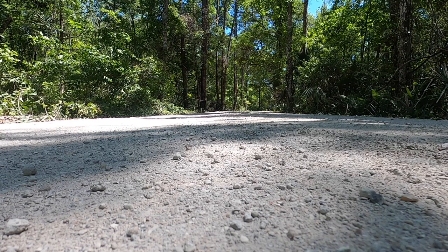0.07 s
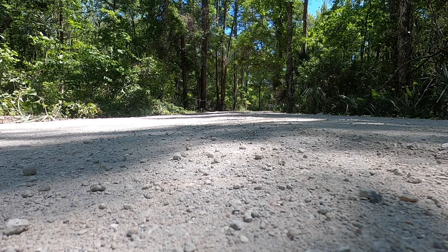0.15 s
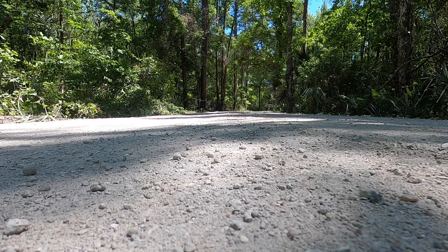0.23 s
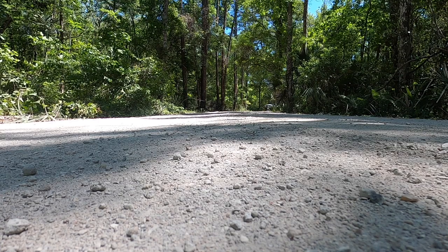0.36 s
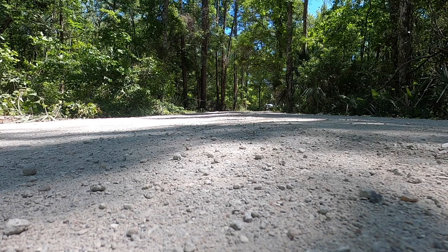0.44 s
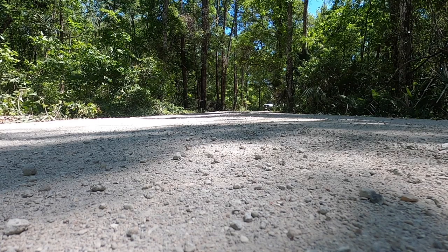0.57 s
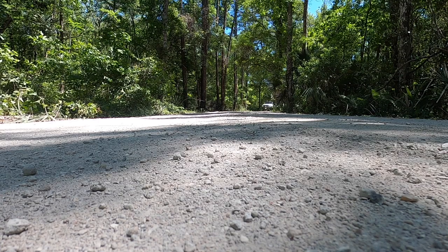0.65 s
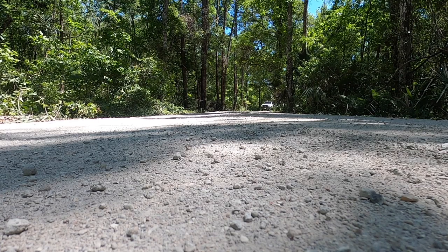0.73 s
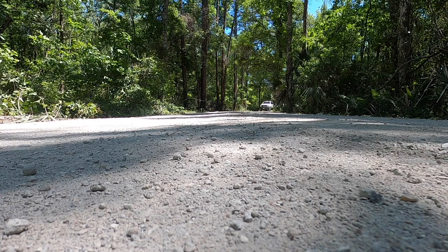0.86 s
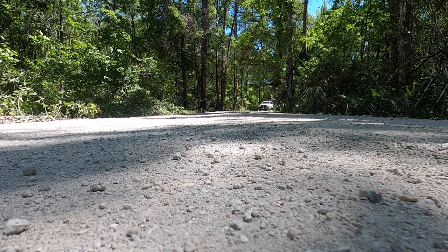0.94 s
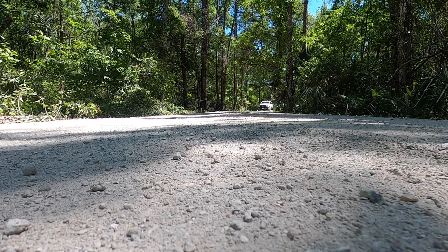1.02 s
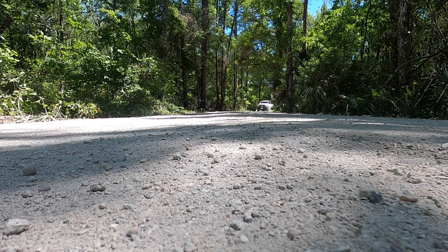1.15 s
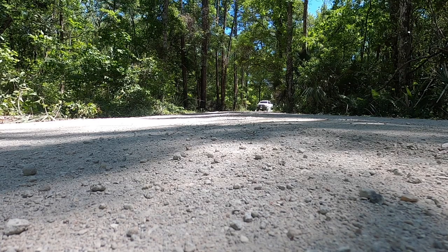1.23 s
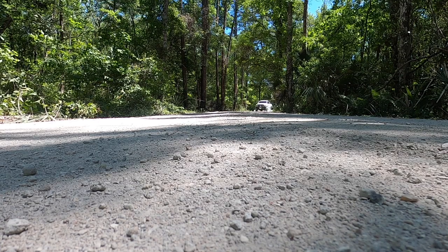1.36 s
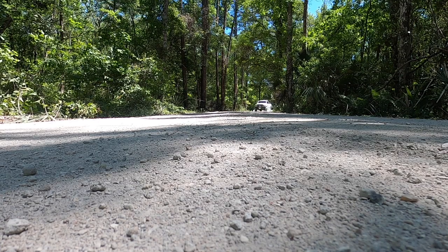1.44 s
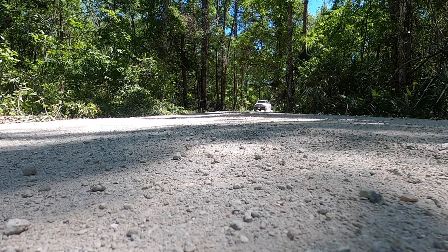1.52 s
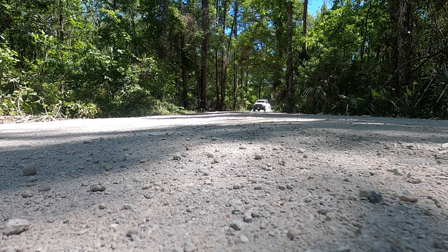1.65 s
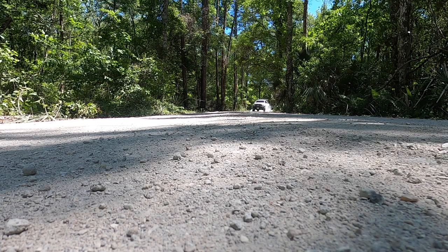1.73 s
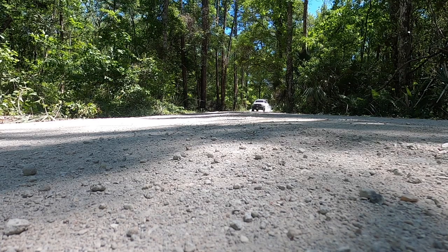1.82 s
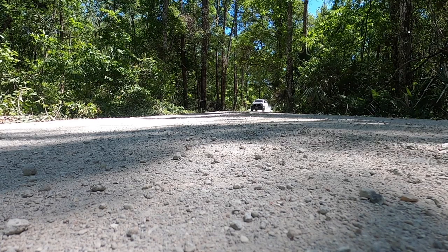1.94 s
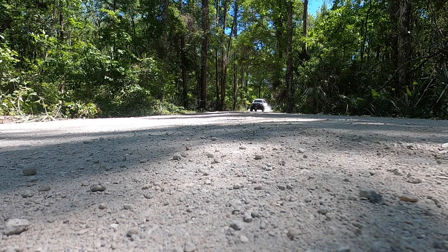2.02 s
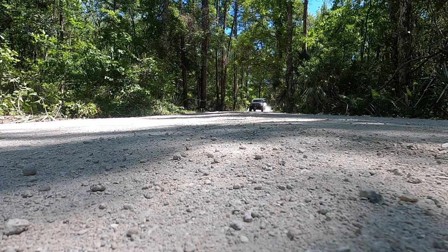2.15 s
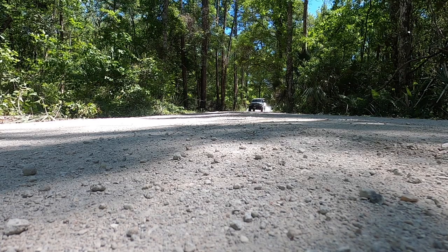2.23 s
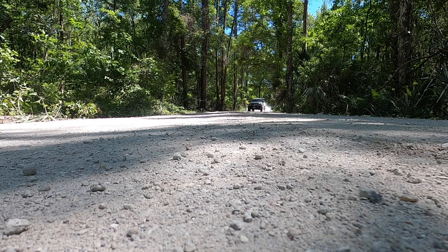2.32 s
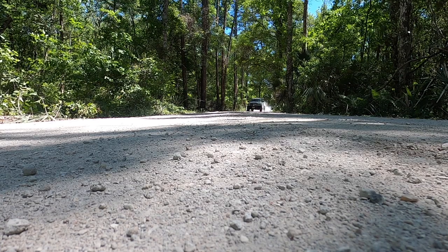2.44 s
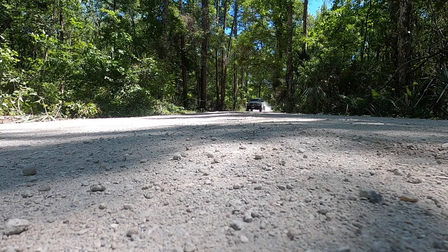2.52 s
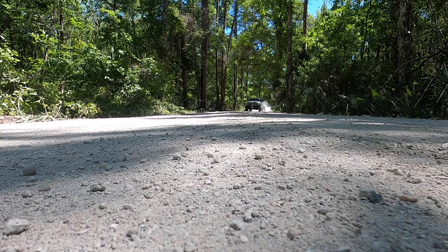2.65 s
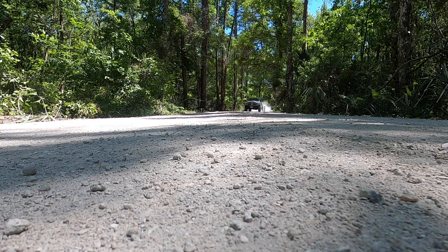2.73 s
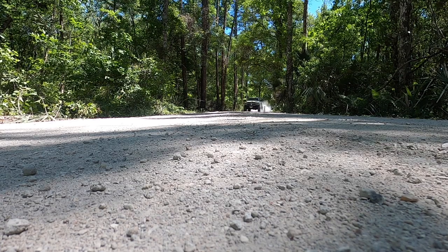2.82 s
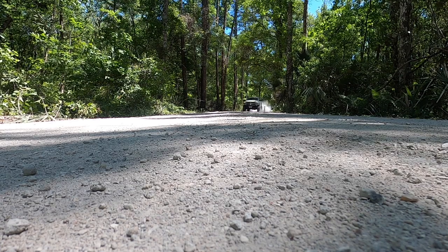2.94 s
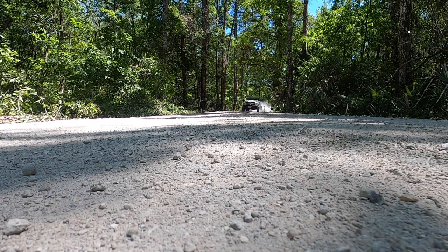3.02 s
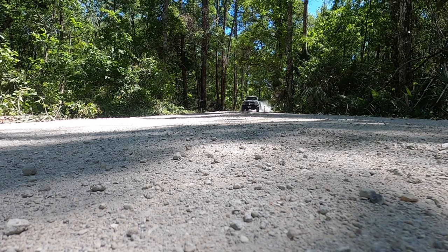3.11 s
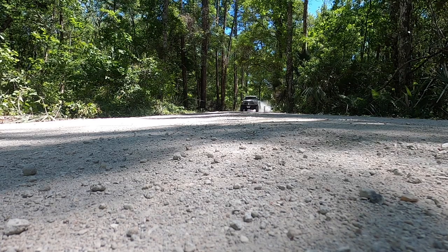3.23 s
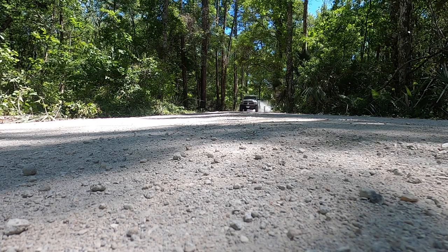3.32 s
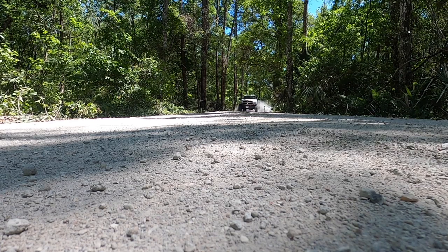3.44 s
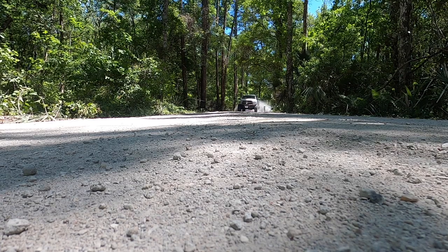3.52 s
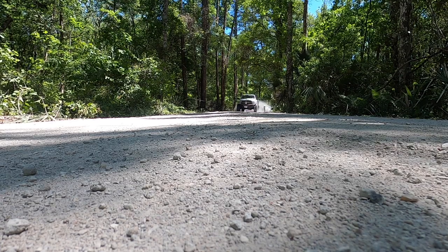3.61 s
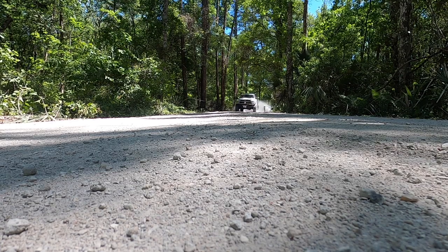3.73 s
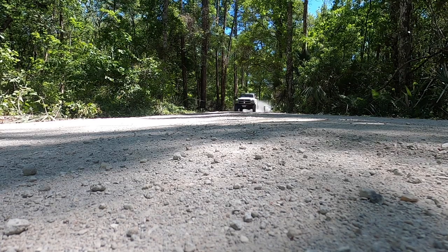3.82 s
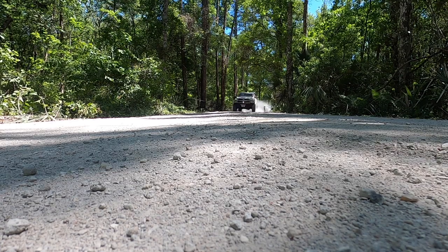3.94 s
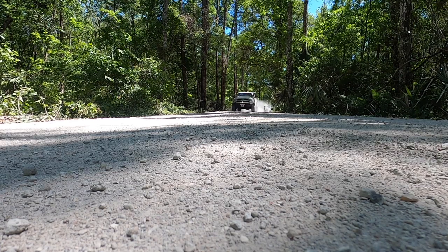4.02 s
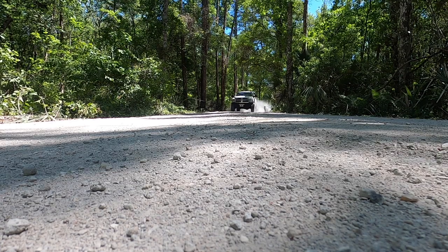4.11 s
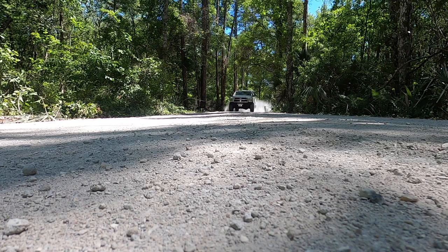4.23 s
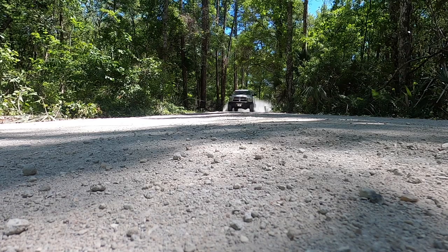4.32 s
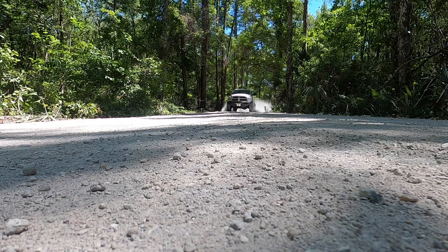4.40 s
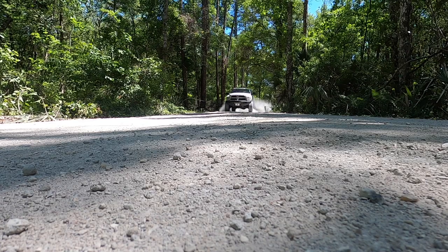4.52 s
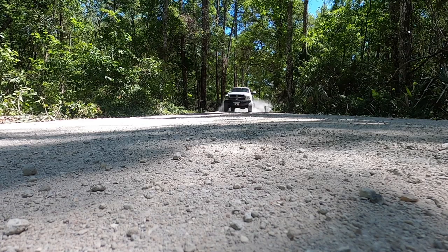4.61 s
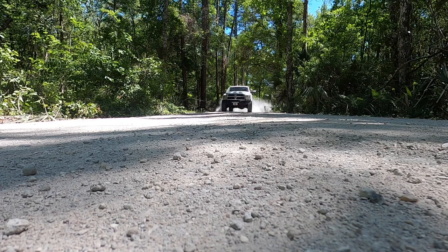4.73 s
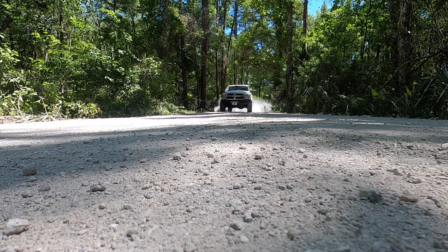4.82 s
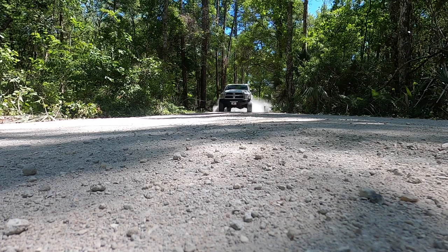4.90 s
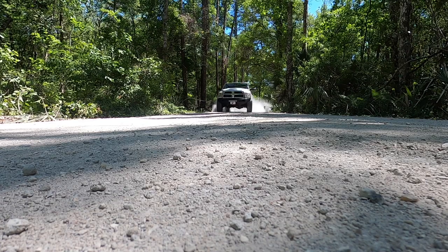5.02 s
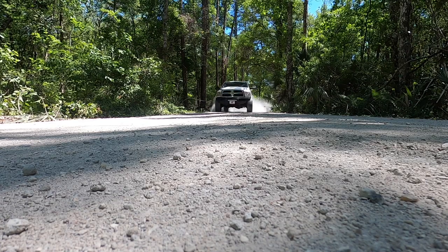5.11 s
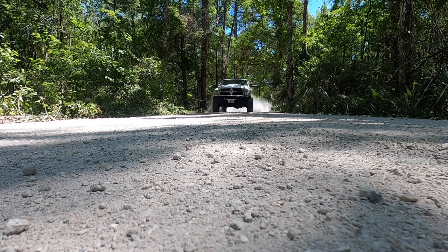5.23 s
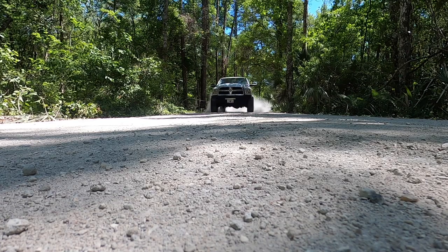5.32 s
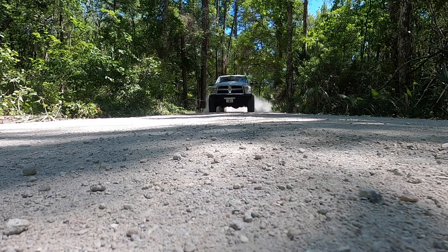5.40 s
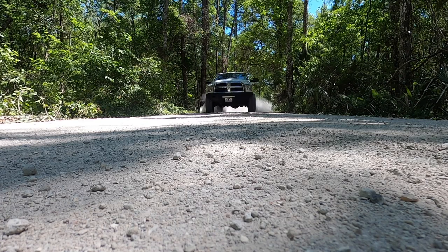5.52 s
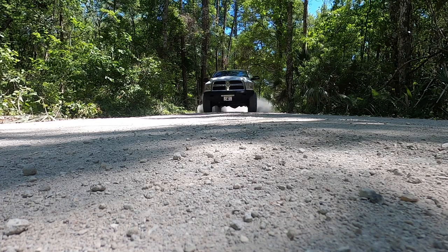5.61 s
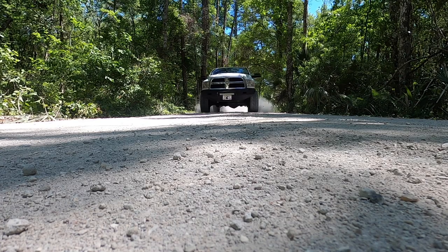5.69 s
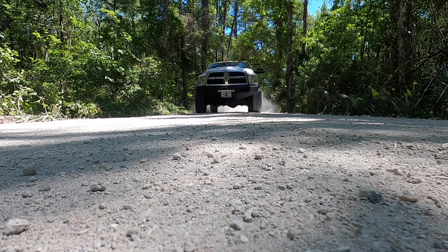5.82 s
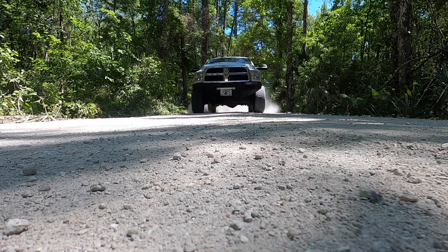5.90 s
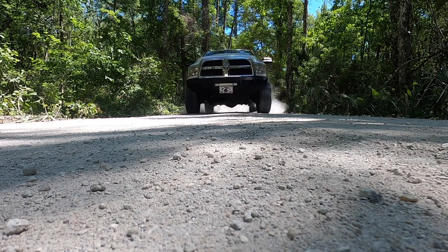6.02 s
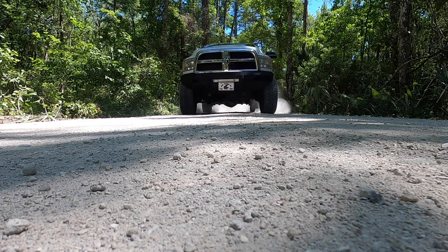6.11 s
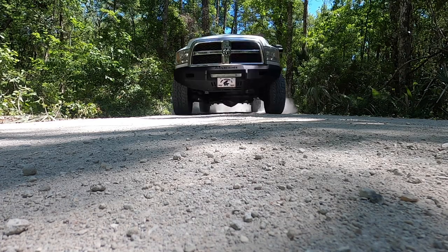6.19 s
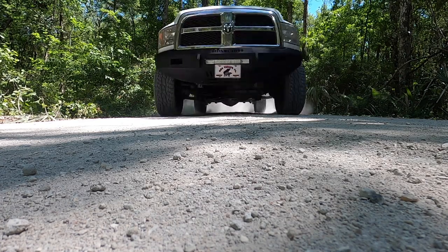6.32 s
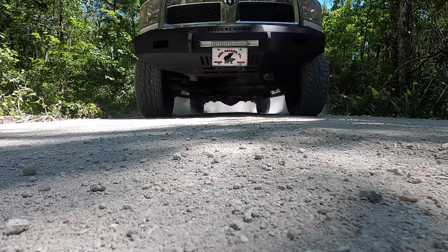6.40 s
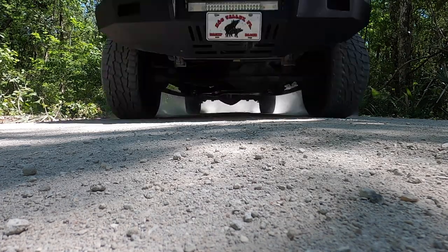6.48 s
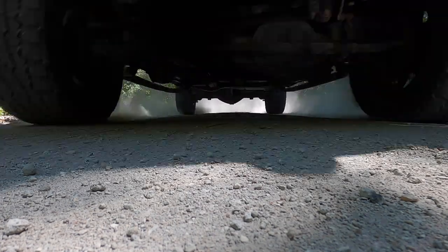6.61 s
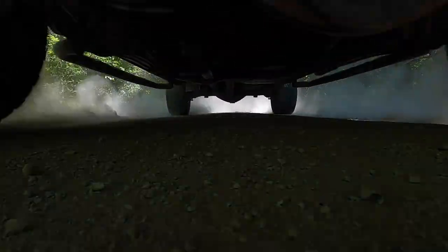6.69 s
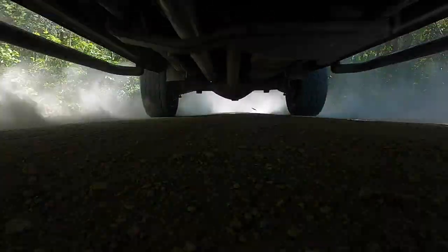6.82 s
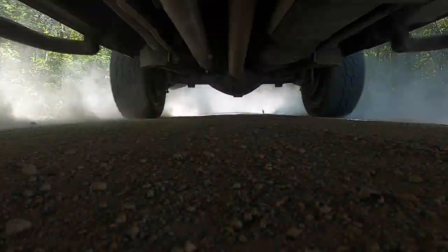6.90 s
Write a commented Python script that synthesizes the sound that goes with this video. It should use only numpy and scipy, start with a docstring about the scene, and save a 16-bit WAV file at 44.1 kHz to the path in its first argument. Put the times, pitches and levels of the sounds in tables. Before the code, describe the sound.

Low engine drone and gravel roar swell from far among trees, a few bird chirps, then a sudden burst of crushing stones directly overhead.

```python
"""Diesel pickup on a gravel forest road

A six-cylinder truck comes over a crest and drives right over a microphone lying on the ground.
Its exhaust is a stack of tones that slide through narrow pipe resonances; filtered clicks and noise
make the block knock, and high tones whine. Coloured noise and clicks make the tyres roar and crush stones,
at last ringing under the chassis. Trees scatter the sound, and a bird chirps in short whistled slides."""
import sys
import numpy as np
from scipy import signal
from scipy.fft import rfft, irfft
from scipy.io import wavfile
from scipy.ndimage import uniform_filter1d, map_coordinates

SR = 44100
rng = np.random.default_rng(int(sys.argv[2]) if len(sys.argv) > 2 else 0)


def int16_out(signal):
    """Quantize to a 16-bit WAV file."""
    q = np.round(np.clip(np.atleast_2d(signal).T, -1, 1) * 32767)
    wavfile.write(sys.argv[1], SR, q.astype(np.int16))


N = 306495
TIME = np.arange(N) / SR
FREQ = np.maximum(np.fft.rfftfreq(N, 1 / SR), 1)
CYLINDERS = 6
CRUISE_HZ = 60  # firing rate at a steady cruise
SPEED_M_S, ARRIVES_S = 9.6, 6.713  # steady speed, and when the front axle is over the microphone
EARS = np.array([[-1], [1]])  # left, right


def undb(db):
    """Turn decibels into a gain."""
    return 10 ** (np.asarray(db) / 20)


def unit(x):
    """Scale to an average (rms) level of 1."""
    return x / np.sqrt(np.mean(x ** 2))


def curves(table):
    """Turn each column of a table into a control over time."""
    s, *columns = np.transpose(table)
    return [np.interp(TIME, s, column) for column in columns]


def colour(points):
    """Gain at every frequency, drawn through points of f/Hz and level/dB."""
    hz, db = np.transpose(points)
    return undb(np.interp(np.log(FREQ), np.log(hz), db))


def resonances(modes, hz):
    """Response of a ringing body; neighbouring resonances swing in opposite senses."""
    response = 0
    for k, (f, width_hz, db) in enumerate(modes):
        response = response + (-1) ** k * undb(db) / (1 + 2j * (hz - f) / width_hz)
    return response


def shape(x, response):
    """Filter by a frequency response, then scale to rms 1."""
    return unit(irfft(rfft(x) * response, N))


def walk(rate):
    """Smooth random wander with a spread near 1, taking a new value rate times a second."""
    k = int(SR / rate)
    held = np.repeat(rng.standard_normal(N // k + 1), k)
    return 1.3 * uniform_filter1d(uniform_filter1d(held, k), k)[:N]


def impacts(rate, spread_db):
    """Random clicks, about rate a second: many small ones, a few large."""
    size = undb(spread_db * np.minimum(rng.exponential(size=N), 4))
    happens = rng.random(N) < rate / SR
    return unit(happens * size * rng.choice([-1, 1], N))


def grains(rate, spread_db, direct):
    """Stone impacts: the direct share stays clicky, the trees scatter the rest into a smooth wash."""
    clicks = np.sqrt(direct) * impacts(rate, spread_db)
    return clicks + np.sqrt(1 - direct) * rng.standard_normal(N)


# How much the two ears differ: f/Hz, level/dB (side against middle)
EAR_DIFFERENCE = [(60, -6), (200, -22), (500, -20), (1200, -15.5), (2000, -25.5), (2800, -17), (4500, -3.5),
                  (8000, -4)]


def spread(source, response):
    """Stereo from one source: every click has its own direction, which the treble shows most."""
    mid = irfft(rfft(source) * response, N)
    scattered = source * rng.standard_normal(N)
    side = irfft(rfft(scattered) * response * colour(EAR_DIFFERENCE), N)
    return np.array([mid + side, mid - side]) / np.std(mid)


def forest(x, t60, wet_db):
    """Tree trunks scatter the sound into a short diffuse tail; t60 is its fade time in seconds."""
    t = TIME[:SR]
    tail = rng.standard_normal(SR) * undb(-60 * t / t60)
    echo = signal.fftconvolve(x, tail[None] / np.linalg.norm(tail), axes=1)[:, :N]
    return (x + undb(wet_db) * echo) / np.sqrt(1 + undb(wet_db) ** 2)


def boosts(events, attack_s, release_s):
    """Gain that moves to a new level, holds and returns for each row of start, length and change in dB."""
    total_db = 0
    for s, length, db in events:
        edge = np.minimum((TIME - s) / attack_s, (s + length - TIME) / release_s)
        total_db = total_db + db * np.clip(.5 + edge, 0, 1)
    return undb(total_db)


# The crest of the road screens the truck at first: t/s, share hidden (0-1)
CREST_SCREEN = [(1.5, 1), (2.35, 0.29), (4.4, 0)]


def hidden():
    """Share of the truck that the crest hides, from 0 to 1."""
    return curves(CREST_SCREEN)[0]


def ground_dip(x, hz=860, width_hz=360, depth=0.67):
    """While sound grazes the crest, the bounce off the road cancels part of it in one band."""
    band = irfft(rfft(x) * resonances([(hz, width_hz, 0)], FREQ), N)
    return x - depth * np.sqrt(np.abs(hidden())) * band


def ahead(behind_m=0):
    """Metres still to go for a part that sits behind the front axle."""
    return SPEED_M_S * (ARRIVES_S - TIME) + behind_m


def approach(db, doubling_db, crest_db, nearest_m, behind_m=0):
    """Gain: db at 10 m in the open, less for each doubling of distance;
    crest_db is lost behind the crest, or gained if negative."""
    metres = np.hypot(ahead(behind_m), nearest_m)
    return undb(db - doubling_db * np.log2(metres / 10) - crest_db * hidden())


def overhead(db, db_per_m, behind_m):
    """Gain of a close-by effect: db as that part passes, fading with each metre."""
    return undb(db - db_per_m * np.abs(ahead(behind_m)))


def covered(behind_m=0.99, fade_m=0.28):
    """Share 0-1 of the sky that the floor of the truck covers."""
    return np.clip(.5 - ahead(behind_m) / fade_m, 0, 1)


# Engine speed as cylinder firings a second: t/s, f/Hz
FIRING_RATE = [(0, 65.2), (.55, 62.9), (.75, 61.24), (1.12, 60.22), (1.5, 61.4), (1.85, 62.3),
               (2.08, 62.44), (2.35, 64.17), (2.53, 65.34), (2.92, 64.26), (3.12, 61.37), (3.55, 60.3),
               (3.8, 60.4), (3.97, 57.18), (4.3, 57.11), (4.5, 60.03), (4.75, 63.38), (5.05, 59.97),
               (5.19, 59.73), (5.35, 57.03), (5.9, 57.37), (6.3, 58.08), (6.95, 57.26)]


def firing_hz():
    """Cylinder firings a second; one four-stroke cycle fires every cylinder once."""
    return curves(FIRING_RATE)[0]


def revs():
    """Firing rate above (or below) cruising, in Hz."""
    return firing_hz() - CRUISE_HZ


# Tones of unequal cylinders: multiple of the four-stroke cycle rate, level/dB
EXHAUST_ORDERS = [(7, 4), (8, -0.5), (9, 7.5), (10, -2.5), (11, -1.5), (12, 10), (13, -4), (14, -2),
                  (15, 4.5), (16, 1.5), (17, 5), (18, 1), (19, 4.5), (20, 0), (21, -6), (22, -4.5), (23, 1),
                  (24, -6), (25, -11.5), (26, -7.5), (27, -6.5), (28, -9), (29, -4), (30, -3), (31, -4),
                  (32, 2)]
# Exhaust pipe resonances: f/Hz, width/Hz, level/dB
PIPE_RESONANCES = [(107.52, 2.82, 5.5), (149.94, 4.74, 5), (191.65, 7, -2), (233.4, 9.4, -8),
                   (275.3, 7.8, -5.5), (308, 7.7, -15.5)]
# Pushes on the throttle: t/s, length/s, extra boom level/dB
THROTTLE_PUSHES = [(0, 0.69, 2.5), (1.22, 0.42, 2), (2.25, 0.2, 4), (4.61, 0.38, 5), (4.98, 0.24, 3),
                   (6.0, 0.14, 4), (6.77, .14, 5)]
PUSH_ATTACK_S, PUSH_RELEASE_S = 0.05, 0.02
BOOM_DB_PER_HZ, BURBLE_DB_PER_HZ = 1.56, 0.33  # growth for each Hz of firing rate
SMEAR = .18  # silencer delay, in cycles for each order squared


def exhaust(cycle_hz, turns, pan_db=2.0, skew=0.1, open_db=0.03, revs_db=1.0, hidden_db=-5.0, under_db=-4):
    """The firing rate booms; the other orders swell as engine speed carries them across a resonance."""
    # tilt in dB per octave: brighter with revs, duller behind the crest and as the body screens the tailpipe
    screen = overhead(db=6.5, db_per_m=2.5, behind_m=1.4)
    bright_db = open_db + revs_db * revs() + hidden_db * hidden() + under_db * screen
    pipe = resonances(PIPE_RESONANCES, FREQ)
    burble = 0
    for order, db in EXHAUST_ORDERS:
        k = round(order)
        # tree echoes shift as the truck moves, so each order wavers, a little differently at each ear
        shared = .1 * (walk(18) + 1j * walk(18))
        per_ear = .11 * EARS * walk(7) * np.exp(2j * np.pi * rng.random())
        paths = 1 + shared + per_ear
        drift = .04 * walk(1.5)
        # the silencer delays each order differently, smearing the puffs into an even burble
        swing = np.exp(2j * np.pi * (k * turns - SMEAR * k ** 2 + drift))
        gain = undb(db + bright_db * np.log2(k * cycle_hz / 150))
        piped = np.interp(k * cycle_hz, FREQ, pipe) * swing
        burble = burble + gain * np.real(paths * piped)
    burble = burble * undb(BURBLE_DB_PER_HZ * revs())
    effort = undb(BOOM_DB_PER_HZ * revs()) * boosts(THROTTLE_PUSHES, PUSH_ATTACK_S, PUSH_RELEASE_S)
    boom = np.sqrt(2) * np.sin(2 * np.pi * CYLINDERS * turns + skew * EARS)
    boom = boom * effort * undb(pan_db * EARS)
    return (burble * approach(db=-24.5, doubling_db=3.5, crest_db=4.0, nearest_m=5.3)
            + boom * approach(db=-28.5, doubling_db=2.5, crest_db=-2.1, nearest_m=5.5))


# Engine block resonances: f/Hz, width/Hz, level/dB
BLOCK_RESONANCES = [(372, 52, -5.5), (485.6, 16, 0), (670, 59, -6.5), (742, 27, -3), (978, 17, -8),
                    (1136, 41, -6.5), (1365, 23, -6)]
KNOCK_DB_PER_HZ = -0.15  # knock softens slightly as the firing rate rises


def knock(turns, decay=0.3, rough=1.0):
    """Each firing raps the block and sets off a short rattle; the cylinders differ."""
    firings = CYLINDERS * turns
    cylinder = firings.astype(int) % CYLINDERS
    strength = undb(2.8 * rng.standard_normal(CYLINDERS))[cylinder]
    raps = unit(np.diff(np.floor(firings), prepend=0))
    # decay is a fraction of the time between firings
    rattle = unit(np.exp(-(firings % 1) / decay) * rng.standard_normal(N))
    body = resonances(BLOCK_RESONANCES, FREQ) / (1 + (280 / FREQ) ** 6 + (FREQ / 2200) ** 4)
    knocks = spread(strength * (raps + rough * rattle), body) * undb(KNOCK_DB_PER_HZ * revs())
    return knocks * approach(db=-39.0, doubling_db=3.5, crest_db=19.5, nearest_m=3.3)


# Engine tones that sing through panels: multiple of the cycle rate (rounded in use),
# panel f/Hz, width/Hz, level/dB
PANEL_WHINES = [(30, 316, 7.7, 0), (31, 316, 11, -0.5), (33, 315, 27, 6.5), (36, 392, 40, -3),
                (69.64, 735, 73, -8.5), (72.2, 755, 57, -1.5), (78.2, 757, 78, -2.5)]


def whine(cycle_hz, turns, flutter_db=2.0, under_db=-5):
    """High orders glide with the revs and sing out at a panel resonance; the body screens them at last."""
    tone = 0
    for order, hz, width_hz, db in PANEL_WHINES:
        k = round(order)
        ring = np.abs(resonances([(hz, width_hz, 0)], k * cycle_hz)) ** 2
        # the shaft turns a little unevenly, which blurs the highest orders most
        shaft = turns + .0015 * walk(20)
        tone = tone + ring * undb(db + flutter_db * walk(14)) * np.sin(2 * np.pi * k * shaft)
    screened = undb(under_db * overhead(db=5.0, db_per_m=1.5, behind_m=0))
    return tone * screened * approach(db=-38.0, doubling_db=4.5, crest_db=12.5, nearest_m=9.1)


# Colour of the tread roar: f/Hz, level/dB
ROAR_COLOUR = [(25, -7.5), (70, -6), (130, -3), (230, 3), (330, 0), (480, -2), (620, -4), (850, -13.5),
               (1400, -24.5), (3000, -63)]
# Colour of the stone crunch: f/Hz, level/dB
CRUNCH_COLOUR = [(300, -33.5), (650, -5), (900, 1), (1150, -1), (1500, -2.5), (2000, -5.5), (2350, -8.5),
                 (2750, -10.5), (3200, -16), (4300, -25), (6000, -39.5), (10000, -70)]
# Colour of the flying grit: f/Hz, level/dB
GRIT_COLOUR = [(1500, -32.5), (3000, -4.5), (4300, -1), (5000, -3.5), (5700, -8), (7000, -10),
               (8000, -16.5), (9500, -26), (12000, -35), (15500, -49)]
# Patches of loose gravel: t/s, length/s, extra grit level/dB
LOOSE_PATCHES = [(2.33, 0.33, 6), (3.54, 0.3, 3.5), (4.35, 0.22, 7), (5.44, 0.14, 3), (5.67, 0.11, 4.5)]
PATCH_ATTACK_S, PATCH_RELEASE_S = .04, 0.27


def tyres(patchy_db=0.61):
    """Tread roars, stones grind and grit flies, most on the loose patches; near by the grains stand out."""
    direct = np.interp(TIME, [0, 5, 6.6], [.2, .4, .95])
    tread = spread(rng.standard_normal(N), colour(ROAR_COLOUR)) * undb(0.67 * walk(15))
    crushed = spread(grains(rate=2000, spread_db=0.5, direct=direct), colour(CRUNCH_COLOUR))
    crushed = ground_dip(crushed)
    flying = spread(grains(rate=3400, spread_db=0.5, direct=direct), colour(GRIT_COLOUR))
    flying = flying * boosts(LOOSE_PATCHES, PATCH_ATTACK_S, PATCH_RELEASE_S)
    tread = tread * approach(db=-34.0, doubling_db=3.5, crest_db=6.5, nearest_m=1.1, behind_m=0.11)
    crushed = crushed * approach(db=-36.0, doubling_db=5.5, crest_db=2.5, nearest_m=1.82, behind_m=0.15)
    flying = flying * approach(db=-57.5, doubling_db=4.5, crest_db=2.5, nearest_m=0.44, behind_m=2.2)
    return tread + undb(patchy_db * walk(30)) * (crushed + flying)


# Still forest air with a faint low rumble: f/Hz, level/dB
AIR_COLOUR = [(20, -4), (38, 7.5), (60, -9), (130, -18.5), (260, -22), (400, -19.5), (600, -32), (850, -42),
              (1500, -31.5), (3000, -35.5), (6000, -57.5), (12000, -85.5)]


def air(db=-53):
    """Coloured noise for the forest background, swelling gently."""
    swell_db = walk(4.6)
    return spread(rng.standard_normal(N), colour(AIR_COLOUR)) * undb(db + swell_db)


# Bird chirps: t/s, length/s, start f/Hz, middle f/Hz, end f/Hz, level/dB (before the forest echo)
BIRD_CHIRPS = [(0.263, 0.015, 3000, 3370, 3900, -63), (0.417, .044, 3640, 3230, 2680, -58.5),
               (0.484, .022, 2580, 2680, 2800, -57.5), (2.337, .018, 3480, 3300, 3280, -54.5),
               (2.538, 0.018, 3450, 3370, 3300, -55.5), (3.180, .016, 3450, 3400, 3300, -62),
               (3.371, .02, 3414, 3303, 3150, -57), (3.550, .016, 3560, 3433, 3150, -55)]


def bird():
    """Quick whistled slides: one gliding sine tone each, echoed by the trees."""
    song = 0
    for s, length, start_hz, middle_hz, end_hz, db in BIRD_CHIRPS:
        progress = np.clip((TIME - s) / length, 0, 1)
        hz = np.interp(progress, [0, .5, 1], [start_hz, middle_hz, end_hz])
        swell = np.sqrt(2 * np.abs(np.sin(np.pi * progress)))
        song = song + undb(db) * swell * np.sin(2 * np.pi * np.cumsum(hz) / SR)
    return forest(np.array([song, song]), t60=0.56, wet_db=-2.5)


# Single stones pinched out by a tyre, far ticks and then loud cracks close by:
# t/s, level/dB, ring f/Hz, ring width/Hz, time to fade by 60 dB/s
PINCHED_STONES = [(2.34, -54, 4200, 2000, .025), (2.384, -61, 6000, 1602, .025),
                  (2.439, -57, 5560, 1600, 0.02), (2.484, -59, 4800, 1400, .025),
                  (2.554, -57, 5300, 1800, 0.018), (2.690, -61, 4810, 800, 0.022),
                  (6.631, -21, 2020, 500, .035), (6.648, -28, 2850, 501, 0.036),
                  (6.698, -30, 1454, 350, 0.048), (6.715, -23, 980, 299.6, 0.058),
                  (6.735, -17, 2000, 600, .025), (6.745, -24.5, 2680, 500, .045),
                  (6.750, -23, 1074, 300, .06), (6.803, -16, 1440, 350, .07), (6.820, -17, 980, 250, 0.059),
                  (6.838, -26, 2750, 600, 0.024), (6.855, -19.5, 1620, 280.2, 0.067),
                  (6.856, -14, 1134, 220, 0.046), (6.874, -24, 1550, 250, 0.046),
                  (6.858, -32, 4670, 500, .03), (6.905, -34, 4050, 399.5, .03),
                  (6.916, -28, 3900, 900, 0.022)]


def stones():
    """A pinched stone snaps and rings as fading filtered noise; its pitch sets how wide it sounds."""
    out = np.zeros((2, N + SR))
    t = TIME[:SR // 4]
    for s, db, hz, width_hz, t60 in PINCHED_STONES:
        edges = [hz - width_hz / 2, hz + width_hz / 2]
        band = signal.butter(1, edges, "band", fs=SR, output="sos")
        fade = np.exp(-np.log(1000) * t / t60)
        noise = rng.standard_normal((2, len(t)))
        rings = signal.sosfilt(np.vstack([band, band]), noise) * fade
        mid, side = (undb(db) * ring * np.linalg.norm(fade) / np.linalg.norm(ring) for ring in rings)
        side = side * np.interp(hz, FREQ, colour(EAR_DIFFERENCE))
        start = int(s * SR)
        out[:, start:start + len(t)] += np.array([mid + side, mid - side])
    return out[:, :N]


# Thin metallic squeaks, and last a metal part ringing as stones strike it: t/s, length/s, f/Hz, level/dB
METAL_SQUEAKS = [(4.35, 0.089, 7600, -69), (5.423, 0.13, 7657, -66), (5.627, 0.19, 7680, -64),
                 (6.876, 0.049, 4950, -35)]


def squeaks(width_hz=300):
    """Something metal on the truck chafes: short swells of noise in a narrow, very high band. The last row is a
    metal part ringing lower as stones strike it."""
    out = 0
    for s, length, hz, db in METAL_SQUEAKS:
        progress = np.clip((TIME - s) / length, 0, 1)
        swell = np.sqrt(np.abs(np.sin(np.pi * progress)))
        narrow = resonances([(hz, width_hz, 0)], FREQ) ** 2
        out = out + undb(db) * swell * shape(rng.standard_normal((2, N)), narrow)
    return out


# Resonances of the gap between road and chassis: f/Hz, width/Hz, level/dB
GAP_RESONANCES = [(747, 44, -1.5), (864, 14, -13.5), (1140, 130, -6.5), (1535, 110, -3), (2790, 110, -9),
                  (3410, 63, -18.5), (4070, 400, -23.5)]
# Quick changes in the crush of stones under the truck:
# t/s, length/s, level change/dB (negative is quieter)
CRUSH_CHANGES = [(6.748, 0.012, 6), (6.79, 0.023, -2), (6.838, 0.011, -1)]
CHANGE_ATTACK_S, CHANGE_RELEASE_S = .005, 0.01


def underside(spread_db=3.0, lumpy_db=1.5, drift=.02):
    """Crushed stones ring the gap under the truck unevenly; its pitch shifts as the floor slides over."""
    crushed = impacts(2400, spread_db)
    tint = colour([(300, -6.0), (800, 3.0), (2200, -3.5), (5000, 2), (9000, -28.5), (15000, -45.5)])
    gap = resonances(GAP_RESONANCES, FREQ) * tint
    # reading the sound slightly faster or slower moves its pitch
    place = np.arange(N) + np.cumsum(drift * walk(14))
    rung = np.array([map_coordinates(ear, [place], order=3, mode="mirror") for ear in spread(crushed, gap)])
    unevenness = undb(lumpy_db * walk(45)) * boosts(CRUSH_CHANGES, CHANGE_ATTACK_S, CHANGE_RELEASE_S)
    return rung * unevenness * overhead(db=-25.5, db_per_m=2.0, behind_m=1.0)


# Colour of fine grit sprayed up beside the microphone: f/Hz, level/dB
SPRAY_COLOUR = [(1200, -17.5), (2600, -2.5), (4200, -0.5), (5600, 1), (7400, -6.5), (9500, -16.5),
                (12500, -21.5), (15000, -32)]


def spray(spread_db=1.5, grainy=0.67, flutter_db=-2.5, surge_db=4, surge_s=6.715, rise_s=.03):
    """Dense grit hisses up on both sides, and surges as the front tyres draw level with the microphone."""
    grit = np.array([grainy * impacts(9000, spread_db) + rng.standard_normal(N) for ear in range(2)])
    surge = surge_db * np.clip(.5 + (TIME - surge_s) / rise_s, 0, 1)
    hiss = shape(grit, colour(SPRAY_COLOUR)) * undb(surge + flutter_db * walk(27))
    return hiss * overhead(db=-40.5, db_per_m=4.5, behind_m=0.66)


# Hum of the tread blocks: multiple of the block rate, level/dB
TREAD_TONES = [(6, -2.5), (7, 2.5), (8, -2), (9, -1), (10, -6.5)]
TREAD_HZ = 164.3  # average block rate


def tread_hum(flutter_db=8.5):
    """Tread blocks slap the road at a nearly steady rate; the hum only carries a few metres."""
    slaps = np.cumsum(TREAD_HZ * (1 + .007 * walk(30))) / SR
    hum = 0
    for k, db in TREAD_TONES:
        level = undb(db + flutter_db * walk(25))
        hum = hum + level * np.sin(2 * np.pi * (round(k) * slaps + rng.random()))
    return unit(hum) * overhead(db=-24.5, db_per_m=6.5, behind_m=0.67)


def chassis_echo(x, db=-6.5, t60=0.039, low_hz=600):
    """Under the truck, tyre noise bounces between road and floor and arrives from both sides."""
    t = TIME[:SR // 10]
    bounces = rng.standard_normal((2, len(t))) * undb(-60 * t / t60)
    bright = irfft(rfft(x) / (1 + (low_hz / FREQ) ** 2), N)
    echo = signal.fftconvolve(bright[None], bounces / np.linalg.norm(bounces[0]), axes=1)[:, :N]
    return undb(db) * echo * covered()


# Colour of the air dragged along under the truck: f/Hz, level/dB
DRAUGHT_COLOUR = [(15, -1), (35, 0), (70, -2), (150, -2), (350, -13), (600, -23), (1500, -49)]


def draught(db=-25.0):
    """Air dragged along under the floor buffets each microphone port on its own."""
    gust_db = 3 * walk(30)
    return shape(rng.standard_normal((2, N)), colour(DRAUGHT_COLOUR)) * undb(db + gust_db) * covered()


def scene():
    """Mix all sources; the truck starts slightly to the right and ends almost dead ahead."""
    cycle_hz = firing_hz() / CYLINDERS
    turns = rng.random() + np.cumsum(cycle_hz) / SR  # engine cycles so far
    engine = exhaust(cycle_hz, turns) + knock(turns) + whine(cycle_hz, turns)
    rolling = tyres() + tread_hum()
    left, right = engine + rolling + air()
    lag = np.interp(TIME, [0, 4, 6.8], [1.6, 1.5, .2])  # samples by which the left port hears it later
    left = map_coordinates(left, [np.arange(N) - lag], order=3, mode="nearest")
    close_by = underside() + spray() + chassis_echo(rolling.mean(axis=0)) + draught()
    return np.array([left, right]) + close_by + stones() + squeaks() + bird()


TOP_HZ = 15200  # highest frequency kept


def record(dry):
    """A steep low-pass filter cuts the top of the treble."""
    return signal.sosfilt(signal.ellip(8, .2, 70, TOP_HZ, fs=SR, output="sos"), dry)


dry = scene()
out = record(dry)
int16_out(out)
```